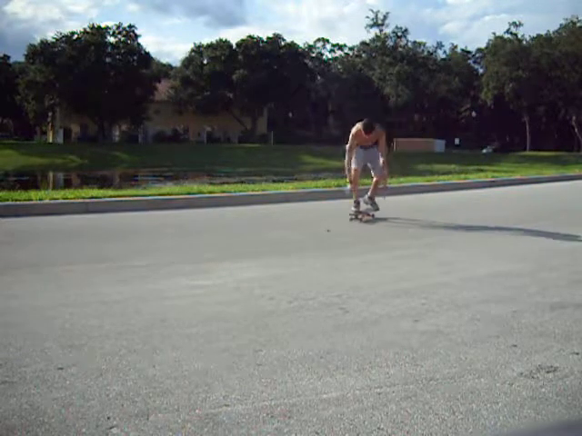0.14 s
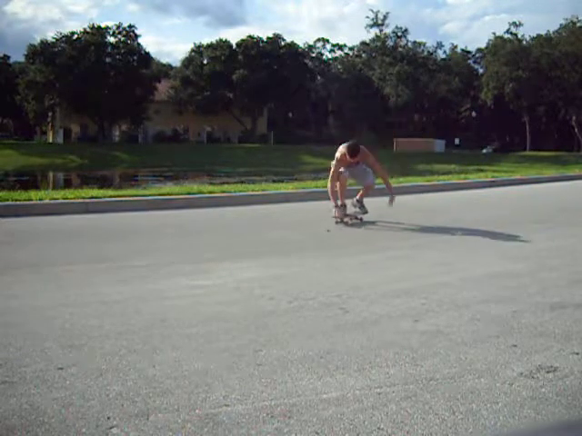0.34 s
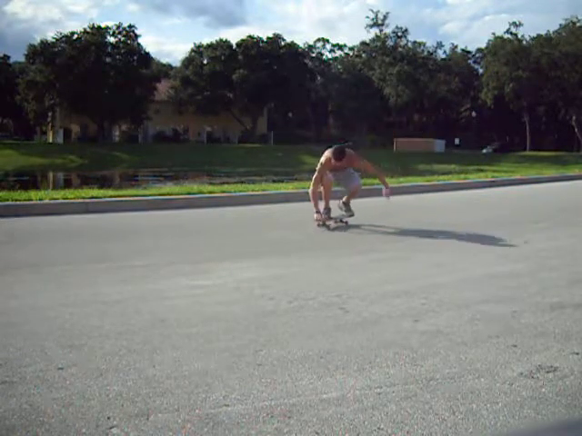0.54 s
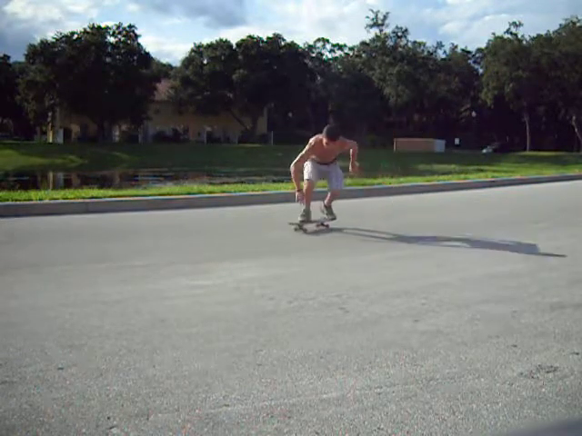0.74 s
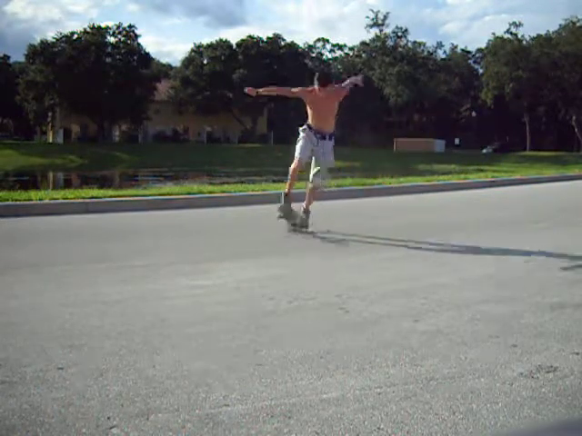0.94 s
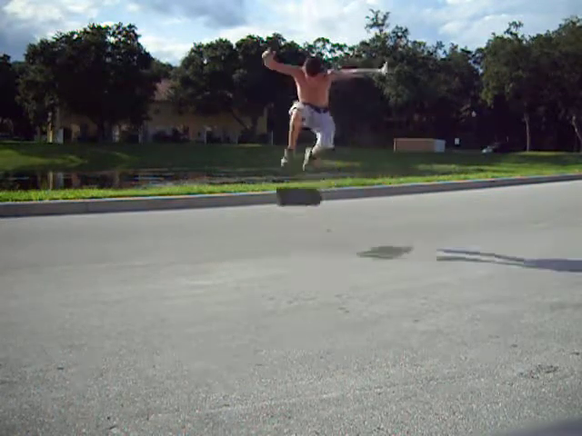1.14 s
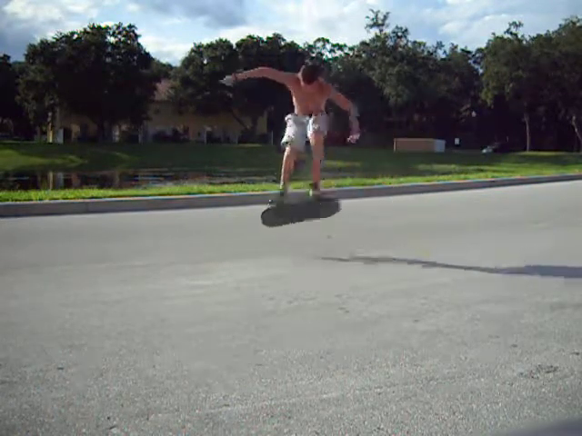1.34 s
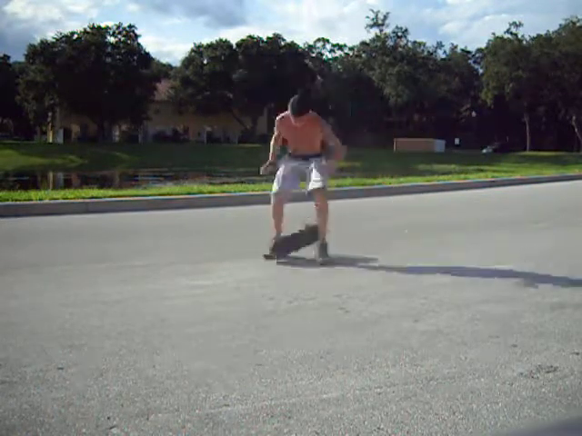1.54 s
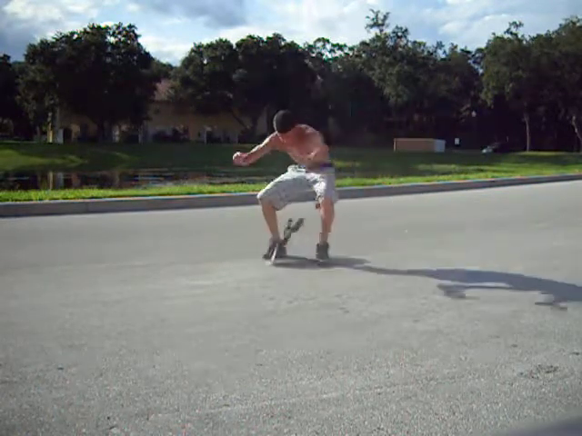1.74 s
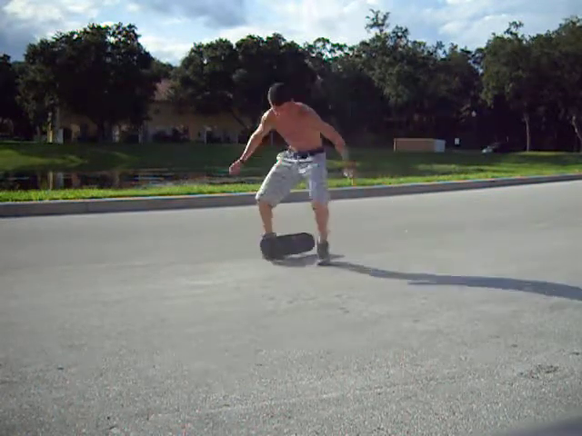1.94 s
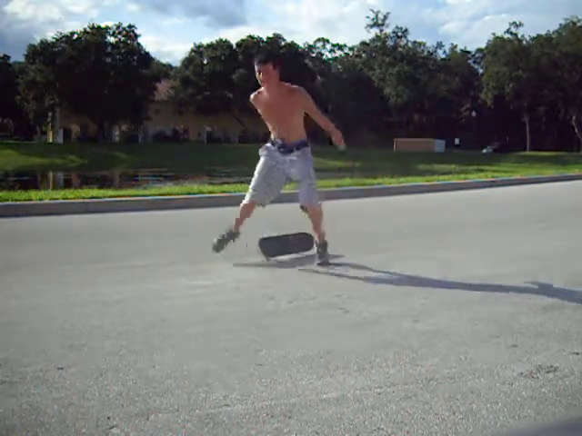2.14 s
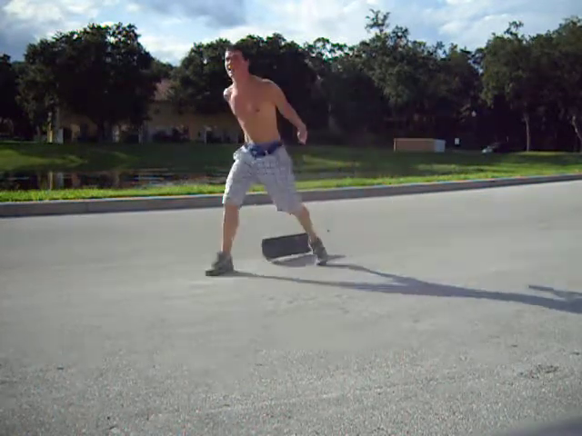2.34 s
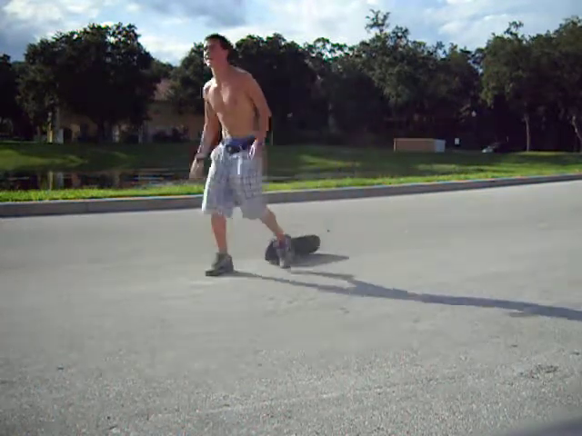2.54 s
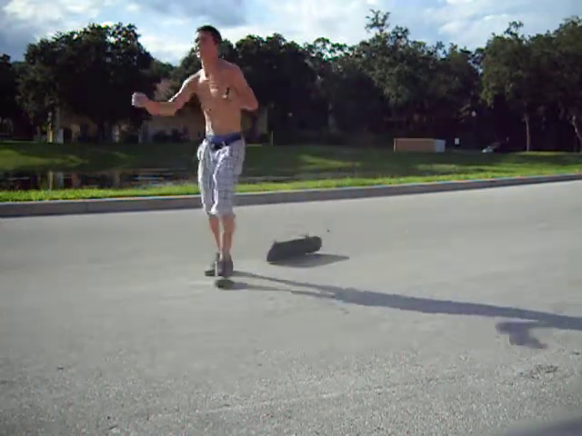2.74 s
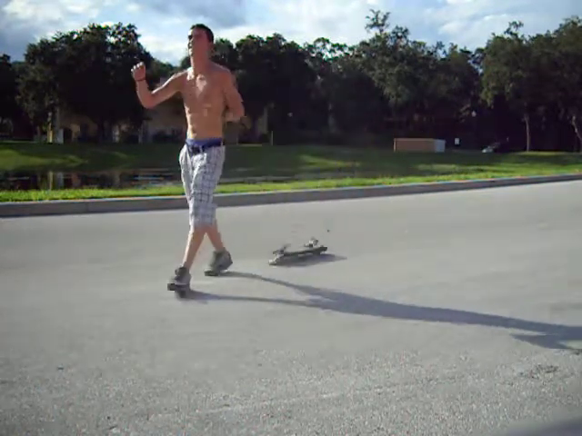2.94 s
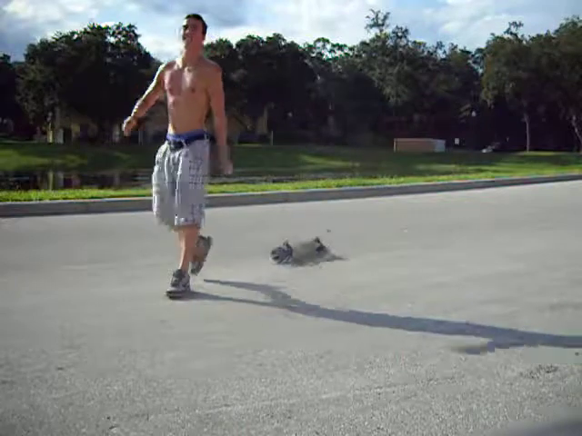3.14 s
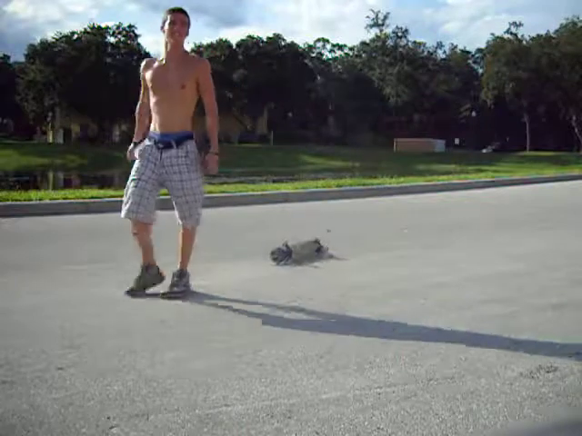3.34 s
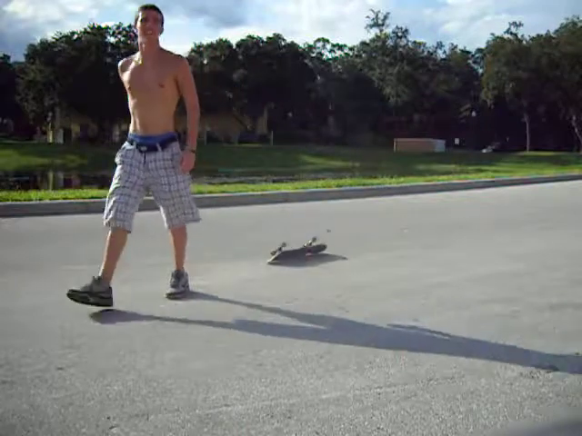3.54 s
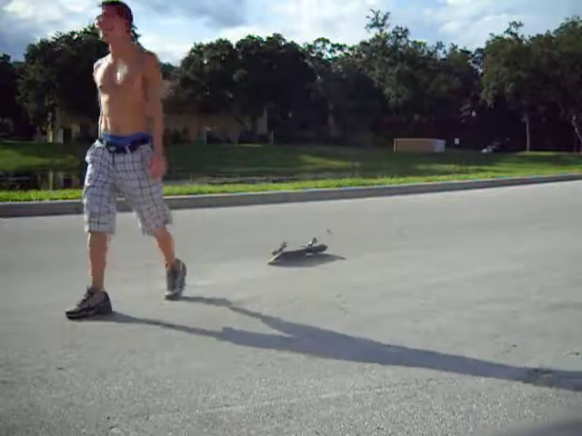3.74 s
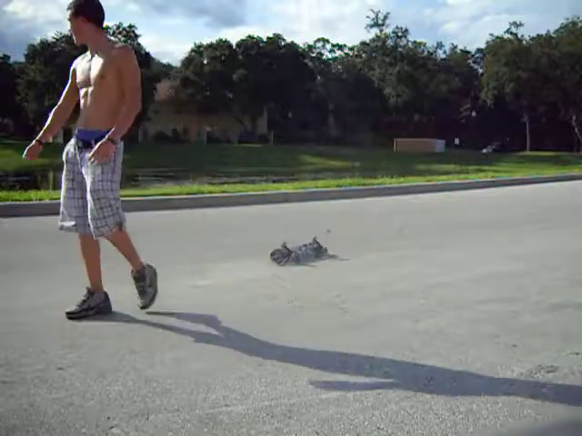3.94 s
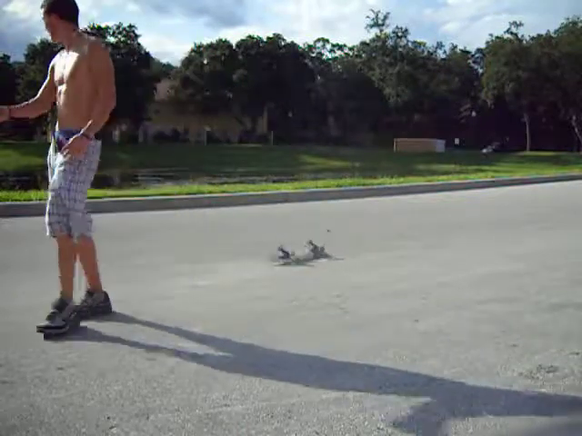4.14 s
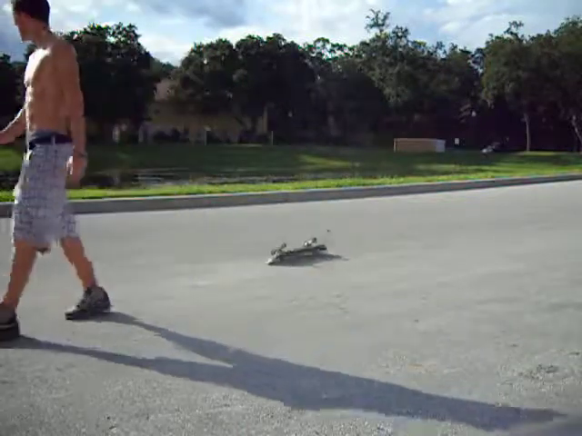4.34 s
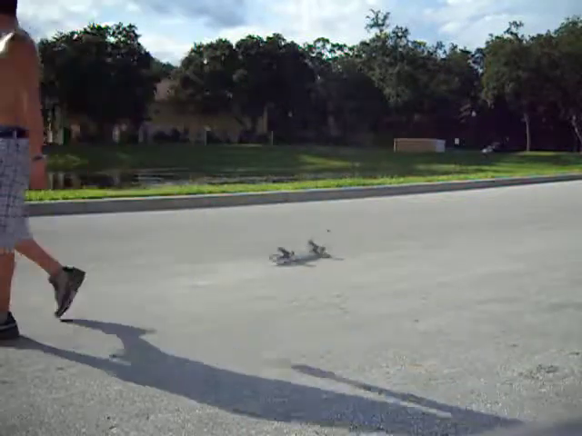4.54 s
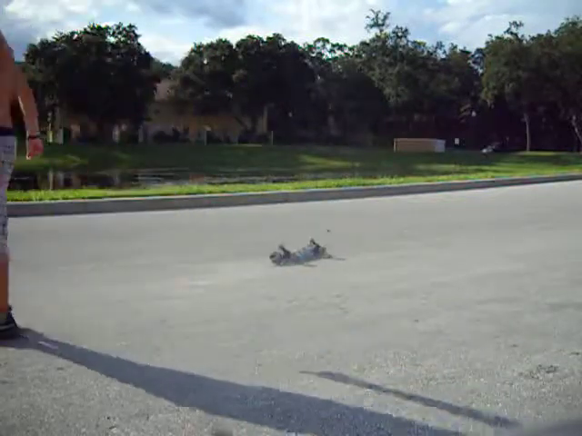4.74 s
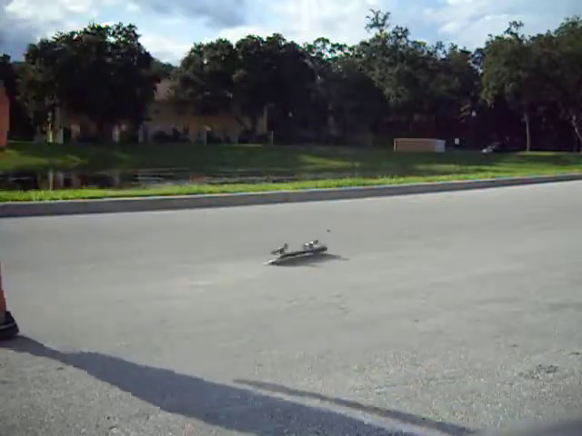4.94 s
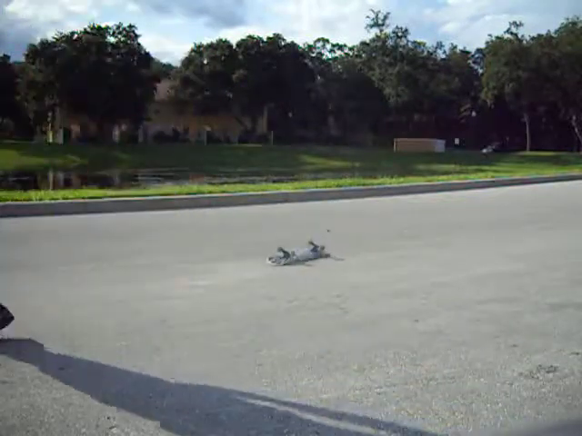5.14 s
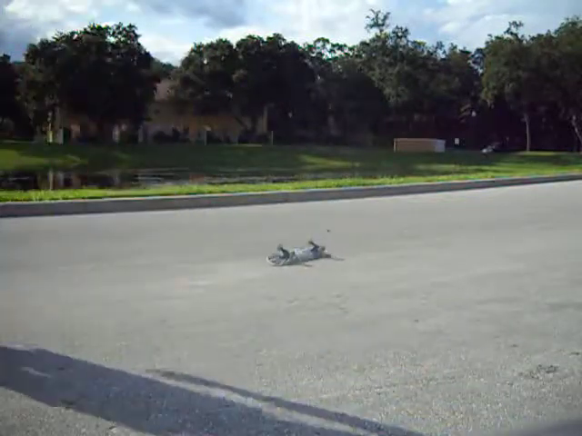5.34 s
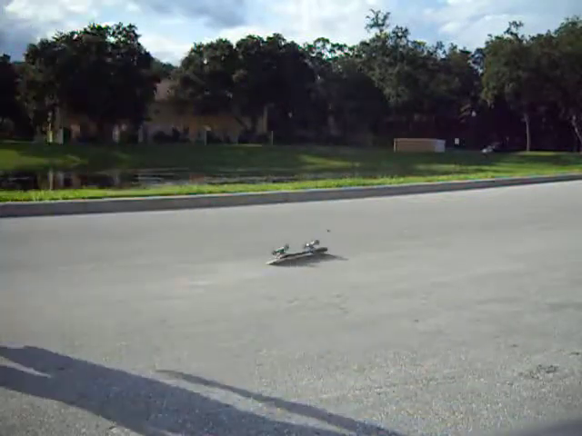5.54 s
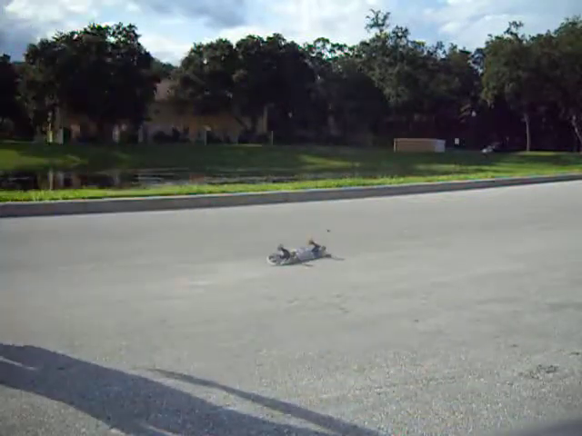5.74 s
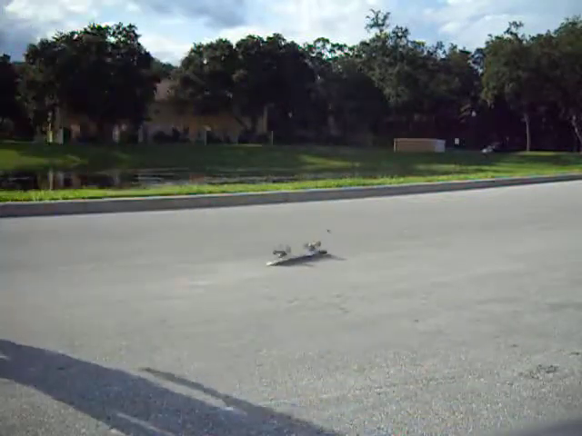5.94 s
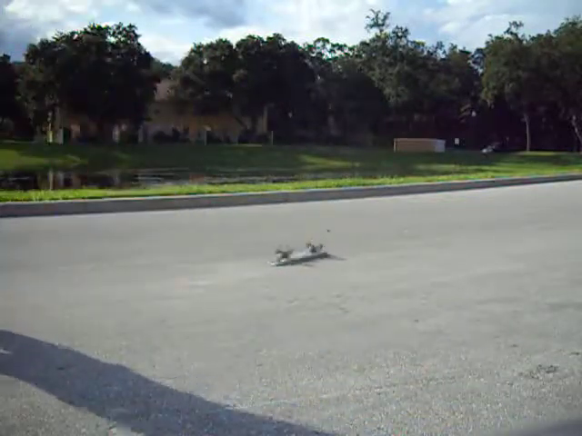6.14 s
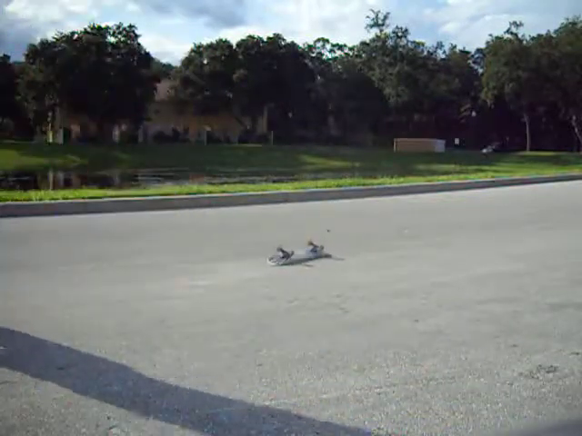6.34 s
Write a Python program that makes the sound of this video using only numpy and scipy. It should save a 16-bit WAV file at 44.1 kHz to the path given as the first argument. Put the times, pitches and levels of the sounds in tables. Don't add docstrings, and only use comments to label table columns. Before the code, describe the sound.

A small, dull outdoor microphone hears skateboard wheels rumbling closer over rough asphalt. The tail scrapes and pops with a hard crack, a brief gap follows, then the deck slams with overloaded wooden clatter. The board falls over with another sharp knock and slides briefly. Soft shoe steps move away as the upturned deck rocks in weakening double taps, under light wind and distant hiss.

```python
import sys
import numpy as np
from scipy import signal
from scipy.fft import rfft, irfft
from scipy.io import wavfile
from scipy.ndimage import uniform_filter1d

SR = 44100
rng = np.random.default_rng(int(sys.argv[2]) if len(sys.argv) > 2 else 0)


def generate_wav(sig):
    pcm = np.round(np.clip(np.atleast_2d(sig).T, -1, 1) * 32767).astype(np.int16)
    wavfile.write(sys.argv[1], SR, pcm)


def volts_from_decibels(level):
    exponent = np.asarray(level, float) / 20
    return 10 ** exponent


N = 281797
T = np.arange(N) / SR

# (frequency [Hz], level [dB], decay time t60 [s])
DECK_MODES = [(173.8, -8.5, 0.049), (244, -6.5, 0.085), (305, -5.5, 0.13), (363, -5.5, 0.19),
              (447.5, -1.5, 0.073), (564.3, 1, 0.088), (692, 0, 0.046), (808.3, -5, 0.19),
              (875, 1.5, 0.061), (990, 8, 0.024), (1205, -9, 0.1), (1307, -10, 0.081)]
# (frequency [Hz], level [dB], decay time t60 [s])
CHIP_MODES = [(1558, -10, 0.04), (1938, -4, 0.04), (2300, 4.5, 0.012), (2586, -1, 0.029),
              (2890, 1.5, 0.0075), (3523, -3.5, 0.016), (3726, -7, 0.018)]


def unit(x):
    return x / np.sqrt(np.mean(x ** 2))


def ring(force, modes):
    out = np.zeros(len(force))
    for k, (hz, db, t60) in enumerate(modes):
        decay = np.log(1000) / (max(t60, 0.004) * SR)
        pole = np.exp(2j * np.pi * hz / SR - decay)
        out += (-1) ** k * volts_from_decibels(db) * signal.lfilter([1], [1, -pole], force).imag
    return out


def coloured(points):
    hz, db = np.transpose(points)
    f = np.maximum(np.arange(N // 2 + 1) * SR / N, 1)
    gain = volts_from_decibels(np.interp(np.log(f), np.log(hz), db, left=-90, right=-90))
    return unit(irfft(rfft(rng.standard_normal(N)) * gain, N))


def walk(rate):
    hold = int(SR / rate)
    steps = np.repeat(rng.standard_normal(N // hold + 1), hold)
    return unit(uniform_filter1d(uniform_filter1d(steps, hold), hold)[:N])


def grit(shape, per_s, spread_db):
    hit = rng.random(shape) < per_s / SR
    return hit * volts_from_decibels(spread_db * rng.exponential(size=shape)) * rng.standard_normal(shape)


def ramp(start, end, from_db, to_db):
    gain = volts_from_decibels(np.interp(T, [start, end], [from_db, to_db]))
    return uniform_filter1d(gain * (T >= start) * (T < end), size=200)


def knocks(table, contact_s, ring_s, own_db=4.0, first_db=13.5, damp=0.4, rise_s=0.00014):
    out, t = np.zeros(N + SR), T[:SR // 4]
    rough = grit((len(table), 2, len(t)), per_s=9000.0, spread_db=3.0)
    bend = rng.standard_normal((len(table), len(DECK_MODES + CHIP_MODES)))
    push = np.exp(-t / contact_s) * (1 - np.exp(-t / rise_s))
    for (s, db, thud_db, hz), (low, high), offsets in zip(table, rough, bend):
        low, high = low * push, high * push
        low[0] = high[0] = volts_from_decibels(first_db)
        modes = [(f, g + 2.74 * d, damp * t60)
                 for (f, g, t60), d in zip(DECK_MODES + CHIP_MODES, offsets)]
        own = [(hz, own_db, ring_s * (500 / hz) ** 0.86)]
        bright = hz > CHIP_MODES[0][0]
        thud = ring(low, modes[:len(DECK_MODES)] + own * (not bright))
        crack = ring(high, modes[len(DECK_MODES):] + own * bright)
        blow = crack / abs(crack).max() + volts_from_decibels(thud_db) * thud / abs(thud).max()
        at = int(s * SR)
        out[at:at + len(t)] += volts_from_decibels(db) * blow
    return signal.sosfilt(signal.butter(3, 190, "high", fs=SR, output="sos"), out[:N])


def air():
    # (frequency [Hz], level [dB])
    air_colour = [(59, -58.5), (100, -4.5), (128, -2.5), (147, -11), (279, -11.5), (336, -31.5), (478, -14),
                  (508, -15.5), (734, -16), (2150, -27.5), (2740, -27.5), (3350, -28), (3900, -31.5),
                  (5070, -72), (8580, -120)]
    flicker_db = 0.3 * walk(2.0) + 0.7 * walk(14.0)
    return coloured(air_colour) * volts_from_decibels(-47.5 + flicker_db)


def wind():
    # (time [s], level [dB])
    wind_levels = [(0.0, -47), (1.17, -48.5), (1.58, -45), (1.69, -49), (2.61, -49), (2.87, -49),
                   (3.29, -47.5), (3.86, -46.5), (4.2, -48.5), (4.4, -48), (4.73, -43.5), (5.36, -44),
                   (5.57, -43.5), (6.39, -44.5)]
    # (frequency [Hz], level [dB])
    wind_colour = [(8.8, -36.5), (15, 1), (59, -2.5), (123, -15.5), (147, -26.5), (280, -19), (335, -21),
                   (400, -17), (520, -54.5), (880, -120)]
    # (time [s], peak level [dB], swing frequency [Hz])
    puffs = [
        (1.605, -19.5, 115),
        (1.957, -39, 70),
        (2.931, -29, 39.6),
        (3.591, -31, 26.9),
        (4.693, -30.5, 26.66),
        (5.137, -24.5, 74),
        (5.367, -28.5, 53.5),
        (5.4, -30, 46.4),
    ]
    turbulence_db = np.interp(T, *np.transpose(wind_levels)) + 1.8 + 0.83 * walk(10.0) + 1.7 * walk(9.4)
    slam_s, shake_db, fade_db_s = 1.484, -29.5, 78
    shake = volts_from_decibels(shake_db - fade_db_s * np.maximum(T - slam_s, 0)) * (T > slam_s)
    out = coloured(wind_colour) * (volts_from_decibels(turbulence_db) + shake)
    for s, db, hz in puffs:
        turns = (T - s) * hz
        swing = np.cos(2 * np.pi * np.clip(turns, -3, 3))
        out += volts_from_decibels(db) * swing * np.exp(-((turns - 0.4) / 0.41) ** 2)
    return out


def houses(near):
    # (delay [s], level [dB], smear [s])
    echoes = [
        (.03, -23, 0.018),
        (.055, -30.5, 0.045),
        (.075, -17.5, 0.017),
        (.11, -28.5, .06),
        (.2, -28.5, 0.24),
    ]
    t = T[:SR // 2]
    envelope = np.zeros(len(t))
    for s, db, smear in echoes:
        tail = (t > s) * np.exp(-np.maximum(t - s, 0) / smear)
        envelope += volts_from_decibels(db) * tail / np.sqrt(smear * SR)
    dull = signal.sosfilt(signal.butter(1, 1800, fs=SR, output="sos"), near)
    return signal.fftconvolve(dull, envelope * rng.standard_normal(len(t)))[:N]


def footsteps():
    # (time [s], scuff peak [dB], thud minus scuff [dB], main pitch [Hz])
    soles = [(2.382, -33, -3.5, 514), (2.5367, -37.5, 4.5, 402), (2.855, -25, -12, 530),
             (2.8774, -31.5, -8, 490), (2.948, -39.5, -2, 363), (3.009, -39.5, 7, 456),
             (3.077, -38.5, 2, 855), (3.1284, -35, 2.5, 940), (3.4414, -39, 4.5, 556),
             (3.5673, -42, 5.5, 857), (3.833, -41.5, 5.5, 530), (3.9696, -41, 5.5, 540)]
    return knocks(soles, contact_s=0.011, ring_s=0.045, own_db=10.0, first_db=6.0, damp=0.35, rise_s=0.0015)


def rocking():
    # (time [s], peak [dB], main pitch [Hz], second touch after [s], its peak [dB])
    swings = [(2.498, -30.5, 472, 0.03, -39), (2.843, -36, 483, 0.024, -44), (3.163, -34.5, 445, 0.02, -40),
              (3.5142, -40, 544, 0.021, -36.5), (3.9158, -38.5, 540, 0.037, -35.5),
              (4.2572, -39, 415, .024, -36), (4.5804, -41, 504, 0.025, -40),
              (4.9012, -38.5, 403, 0.021, -53), (5.176, -46.5, 570, 0.032, -42),
              (5.4666, -41.5, 826, 0.017, -51), (5.7246, -49, 442, 0.023, -49),
              (5.9918, -44.5, 880, 0.023, -65)]
    thud_db = 6.5
    touches = []
    for s, db, hz, gap, then_db in swings:
        touches += [(s, db, thud_db, hz), (s + gap, then_db, thud_db - 3, hz)]
    return knocks(touches, contact_s=0.0093, ring_s=0.04, own_db=9.0, first_db=6.0, damp=0.48, rise_s=0.0019)


def skid():
    from_s, to_s, peak_db = 2.05, 2.155, -42
    swell_db_s, fade_db_s = 35, 140
    slow = signal.butter(2, 220, fs=SR, output="sos")
    grains = [unit(signal.sosfilt(slow, grit(N, per_s=7900.0, spread_db=1.0))) for _ in range(2)]
    whistle_hz = np.interp(T, [2.09, to_s], [2480, 2800])
    moving = grains[0] * np.cos(2 * np.pi * np.cumsum(whistle_hz) / SR)
    high = grains[1] * np.cos(2 * np.pi * 3680 * T)
    high_gain = volts_from_decibels(np.interp(T, [2.07, 2.13], [-14.0, -2.5]))
    slope = np.where(T < to_s, swell_db_s, -fade_db_s)
    gain = volts_from_decibels(peak_db + slope * (T - to_s)) * (T > from_s)
    return gain * (moving + high_gain * high)


def grind():
    # (time [s], deck rumble [dB])
    roll_levels = [
        (0.0, -41),
        (0.3, -38),
        (.45, -39.5),
        (0.6, -37.5),
        (0.97, -36.5),
        (1.045, -47.5),
    ]
    # (start [s], end [s], rumble from
    # [dB], to [dB], grit minus rumble [dB])
    scrapes = [(0.987, 1.045, -39, -22.5, -17), (1.06, 1.106, -32, -54, -0.5),
               (1.11, 1.277, -51.5, -55, -7), (1.408, 1.449, -35, -25.5, -22),
               (1.491, 1.53, -17.5, -21, -7), (1.523, 1.631, -20, -21, -16.5),
               (1.615, 1.743, -36, -40, -7.5), (1.74, 1.91, -45, -38.5, -4.5),
               (1.925, 1.959, -30.5, -27, -4), (1.969, 2.05, -28, -28, -13.5),
               (2.053, 2.407, -36, -52.5, -3.5), (2.396, 4.363, -46, -61, -10), (3.001, 3.3, -62, -66, 4.5),
               (3.53, 3.798, -49, -54.5, -7.5), (3.9, 4.033, -51.5, -59, -4)]
    rolling = ramp(-1, roll_levels[-1][0], 0, 0)
    rumble = rolling * volts_from_decibels(np.interp(T, *np.transpose(roll_levels)))
    hiss = rolling * volts_from_decibels(-52.5)
    for start, end, from_db, to_db, grit_db in scrapes:
        drag = ramp(start, end, from_db, to_db)
        rumble += drag
        hiss += drag * volts_from_decibels(grit_db)
    stones = grit(N, per_s=3500.0, spread_db=2.2) * volts_from_decibels(1.4 * walk(24.89))
    sand = grit(N, per_s=7000.0, spread_db=2.1) * volts_from_decibels(0.75 * walk(30.8))
    loaded = [(hz, db - 4.1 * np.log2(hz / 400), 0.54 * t60) for hz, db, t60 in DECK_MODES]
    deck = unit(ring(stones, loaded)) * rumble
    chips = unit(ring(sand, CHIP_MODES)) * hiss
    return volts_from_decibels(-0.85) * (deck + chips)


def tumble():
    # (time [s], crack peak [dB], thud minus crack [dB], main pitch [Hz])
    falls = [(1.920, -25, 0, 562), (1.955, -7, -2, 2585), (1.9555, -16.6, 14, 490), (1.996, -26, -3, 1950),
             (2.022, -20, 6, 510), (2.035, -27, -0.5, 698), (2.138, -37.5, 7, 299), (2.155, -34, 6, 298),
             (2.418, -35, 10, 560), (4.085, -31, 3, 540), (5.907, -38.5, -20, 3060)]
    return knocks(falls, contact_s=0.0016, ring_s=0.032)


def pop():
    # (time [s], crack peak [dB], thud minus crack [dB], main pitch [Hz])
    snaps = [(.301, -34.5, 10, 330), (.339, -37.5, 11, 920), (.563, -44, 16, 468), (.709, -32.5, 5.5, 390),
             (.739, -40.5, 11, 477), (.87, -35.5, -23.5, 3630), (.968, -22.5, -20, 2650),
             (1.001, -42, 13, 850), (1.008, -43, 21.5, 940), (1.019, -34, 13.5, 300),
             (1.028, -26.5, 4.5, 394), (1.037, -26.5, 11, 334), (1.049, -1, -23.5, 2638),
             (1.050, -22.5, 7, 380), (1.0505, -10.5, 4.5, 873), (1.056, -15.5, 3.5, 1510),
             (1.082, -33.5, 10.5, 518), (1.103, -33, 3.5, 1420), (1.127, -40.5, 0.5, 1462)]
    return knocks(snaps, contact_s=0.0027, ring_s=0.05)


def landing():
    # (time [s], crack peak [dB], thud minus crack [dB], main pitch [Hz])
    slams = [(1.409, -44.5, 7, 805), (1.421, -39.5, 16, 603), (1.429, -35.5, 18.5, 727),
             (1.450, -40.5, 21, 697), (1.483, -32, 18, 501), (1.488, -0.5, 2, 402.6),
             (1.494, -18, 10.5, 482), (1.504, -6, 10.5, 348), (1.509, -8.5, 10, 427),
             (1.516, -16.5, 16.5, 406), (1.523, -16.5, 15, 450), (1.535, -21.5, 3.5, 505),
             (1.545, -25.5, 13.5, 326), (1.556, -24.5, 15, 510), (1.567, -15.5, 1, 2300),
             (1.582, -19.5, -3, 390), (1.590, -23, 12, 495), (1.604, -30.5, 13, 342),
             (1.612, -28.5, 12.5, 710), (1.625, -14.5, -6, 3300)]
    return knocks(slams, contact_s=0.0035, ring_s=0.048)


def scene():
    board = rocking() + skid() + grind() + tumble() + pop() + landing()
    near = board + footsteps()
    return (near + houses(near) + wind() + air())[None]


def roll_off(x):
    return signal.sosfilt(signal.butter(12, 16620, fs=SR, output="sos"), x)


def record(dry):
    converter_hz, clip_level = 8000, 0.715
    band_filter = signal.firwin(401, 3930, window="blackman", fs=SR)[None]
    band = signal.fftconvolve(dry, band_filter, "same")
    mirror = 2 * band * np.cos(2 * np.pi * converter_hz * T)
    leak_filter = signal.firwin(301, 4300, window="blackman", fs=SR)[None]
    leak = signal.fftconvolve(mirror, leak_filter, "same")
    return roll_off(np.clip(band + volts_from_decibels(-12) * leak, -clip_level, clip_level))


dry = scene()
out = record(dry)
generate_wav(out)
```